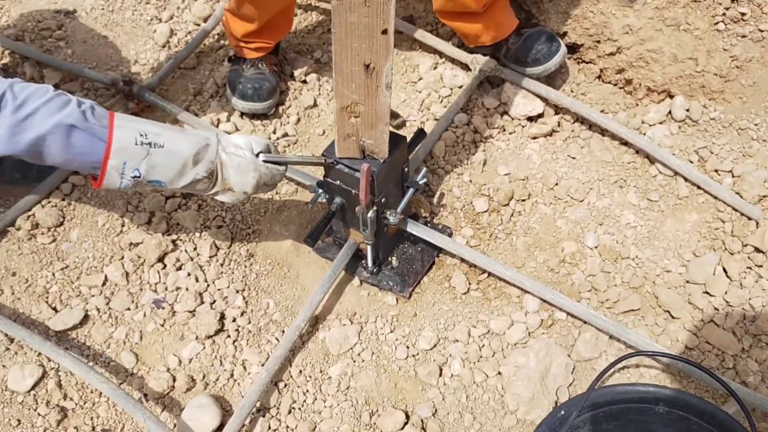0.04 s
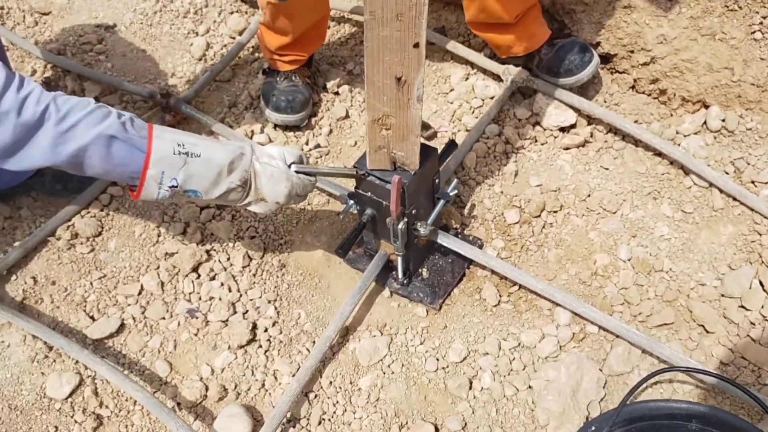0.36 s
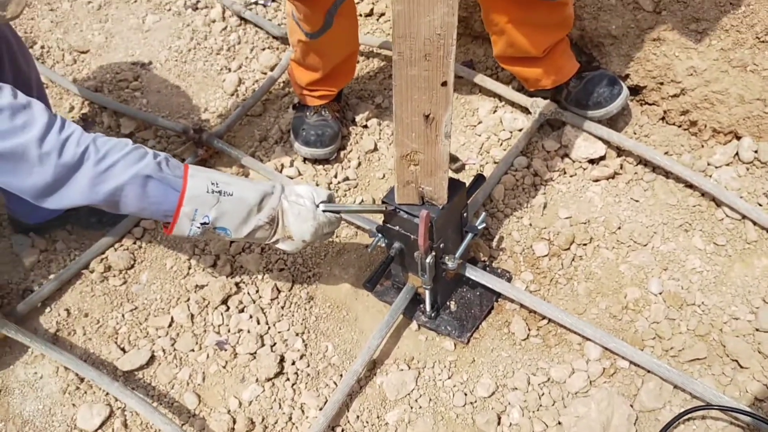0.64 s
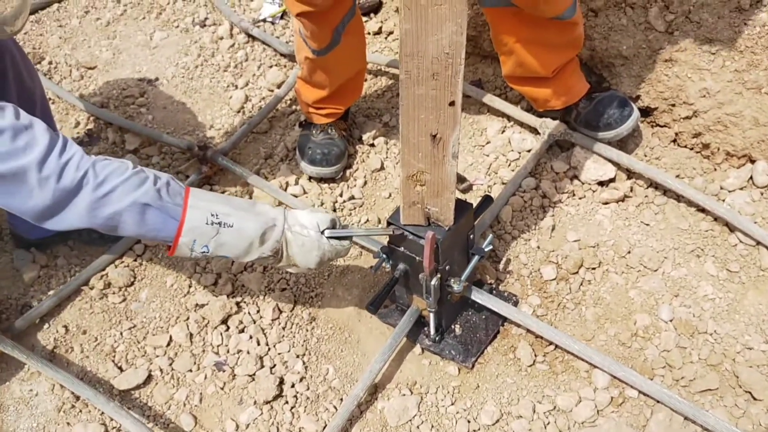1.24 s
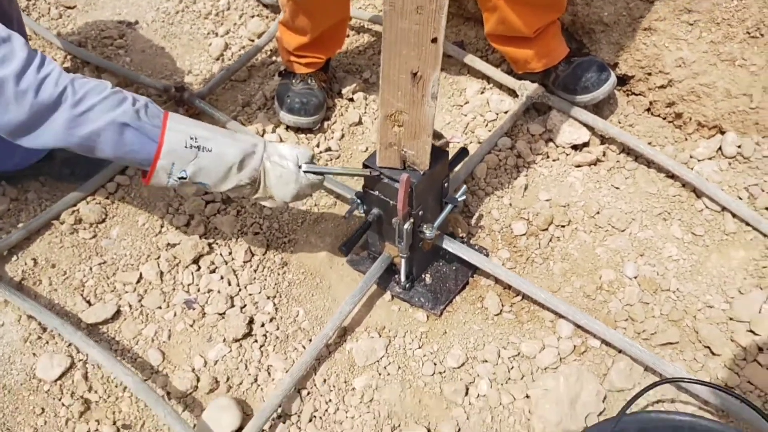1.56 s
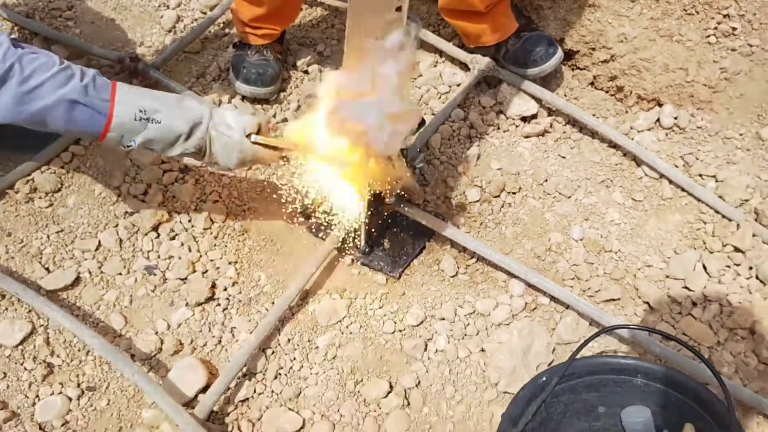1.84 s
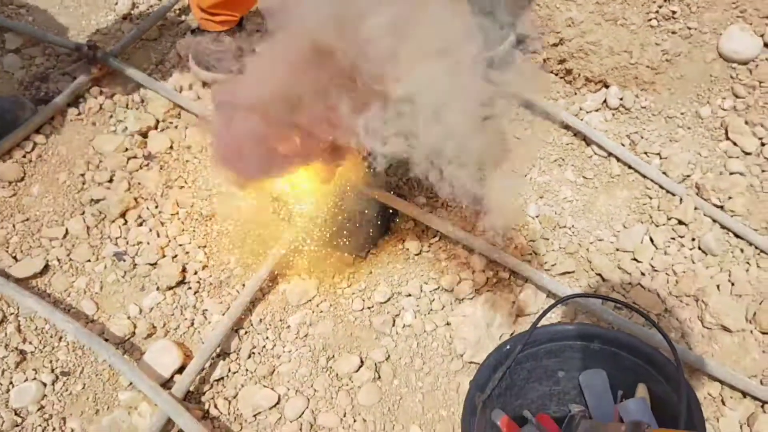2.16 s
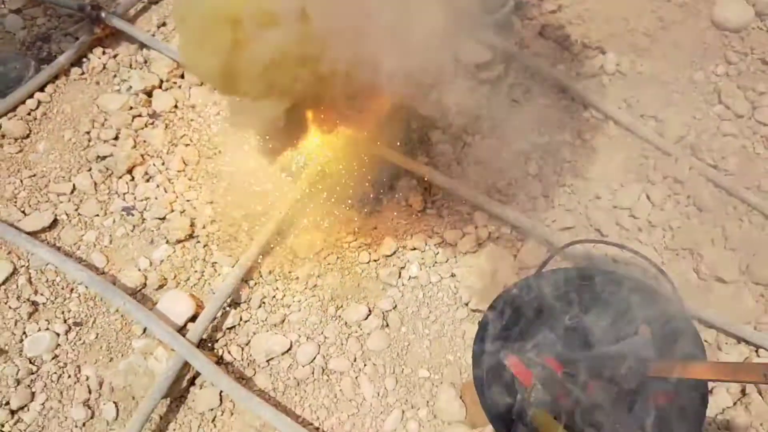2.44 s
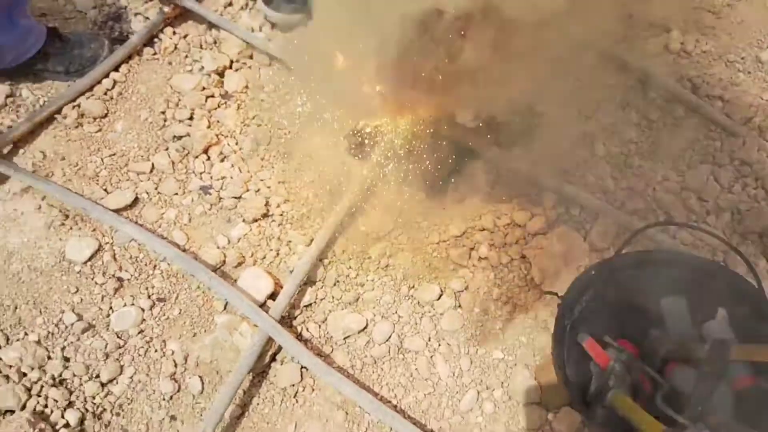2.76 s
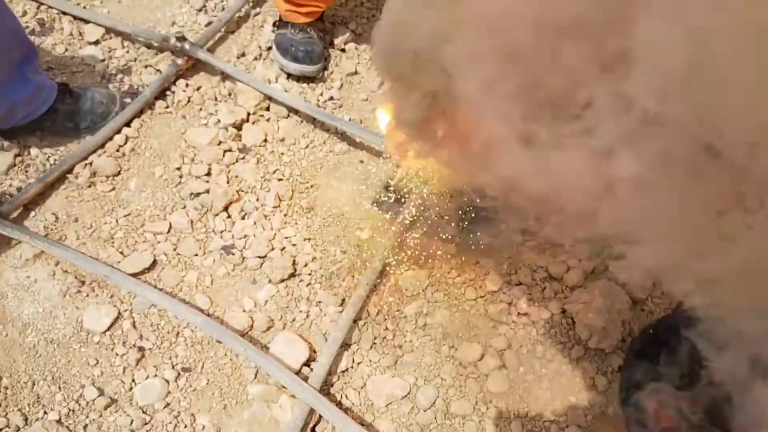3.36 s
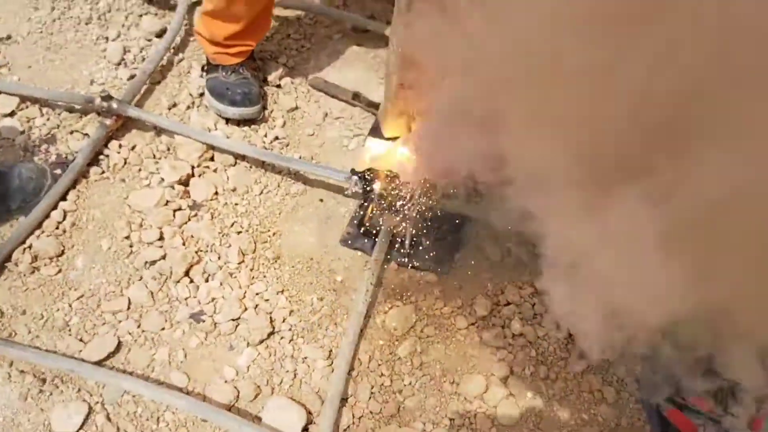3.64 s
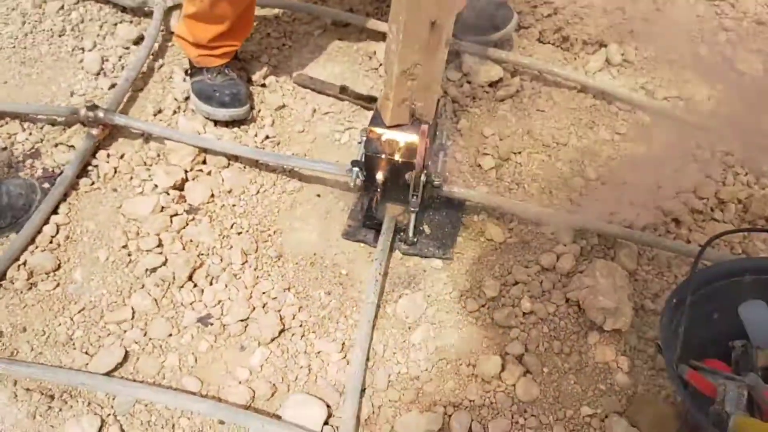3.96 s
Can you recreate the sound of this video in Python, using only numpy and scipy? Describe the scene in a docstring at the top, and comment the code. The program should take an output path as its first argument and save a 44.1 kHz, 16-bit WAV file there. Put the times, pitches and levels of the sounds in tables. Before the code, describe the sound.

A welding charge is lit outdoors, over a steady bright hiss and low engine hum. A flint igniter scrapes among dull handling scuffs, snapping hard at about 0.5 and 1.4 seconds. At 1.6 seconds the powder catches with a small pop and burns with a hollow, fluttering rush. It spits once near 2.6 seconds and dies with a faint fizz around 3.8 seconds.

```python
"""A welding charge burns

A charge is lit in its mould on stony ground, over a steady sizzling hiss and the hum of an engine.
A flint igniter scrapes and snaps; the two hardest snaps make a limiter turn everything down briefly.
The powder catches and burns for two seconds with a hollow, fluttering rush from the mould's mouth."""
import sys
import numpy as np
from scipy import signal
from scipy.fft import rfft, irfft
from scipy.io import wavfile
from scipy.ndimage import uniform_filter1d

SR = 44100
rng = np.random.default_rng(int(sys.argv[2]) if len(sys.argv) > 2 else 0)


def pcm_store(signal):
    """Save signal as 16-bit PCM."""
    levels = np.round(np.clip(np.atleast_2d(signal), -1, 1) * 32767)
    wavfile.write(sys.argv[1], SR, levels.astype(np.int16).T)


N = 176400
T = np.arange(N) / SR
HZ = np.maximum(np.arange(N // 2 + 1) * SR / N, 1)


def amp(db):
    """Turn decibels into a number to multiply a sound by."""
    return 10 ** (np.asarray(db) / 20)


def unit_power(x):
    """Scale a sound so that its average power is 1."""
    return x / np.sqrt(np.mean(x ** 2) + 1e-20)


def level(rows):
    """A volume curve through (time [s], level [dB]) points."""
    return amp(np.interp(T, *np.transpose(rows)))


def drift(rate_hz):
    """A random wander of typical size 1; a higher rate wanders faster."""
    return unit_power(irfft(rfft(rng.standard_normal(N)) / (1 + (HZ / rate_hz) ** 2), N))


def colour(x, points):
    """Shape a sound's lows and highs by (frequency [Hz], level [dB]) points, at power 1."""
    hz, db = np.transpose(points)
    gain = amp(np.interp(np.log(HZ), np.log(hz), db))
    return unit_power(irfft(rfft(x) * gain, N))


def resonant_noise(hz, width_hz):
    """Noise passed twice through one resonance: the narrower it is, the more like a note."""
    r = np.exp(-np.pi * width_hz / SR)
    resonance = [1, 0, -1, 1, -2 * r * np.cos(2 * np.pi * hz / SR), r * r]
    return unit_power(signal.sosfilt([resonance, resonance], rng.standard_normal(N + SR))[SR:])


def swell(peak_s, fade_s, hz, width_hz, db):
    """A band of noise that fades in and out around its peak."""
    return amp(db) * np.exp(-((T - peak_s) / fade_s) ** 2) * resonant_noise(hz, width_hz)


def rasps(rows, tone, attack_s=0.00044, stop_s=0.0014, tail_db=-20.5, tail_s=0.0034):
    """Short bursts of noise: each starts sharply, holds, then stops with a faint tail."""
    envelope = np.zeros(N)
    for start, db, length in rows:
        rise = np.clip((T - start) / attack_s, 0, 1)
        after = np.maximum(T - start - length, 0)
        fall = np.exp(-after / stop_s) + amp(tail_db) * np.exp(-after / tail_s)
        envelope += amp(db) * rise * fall
    grit = colour(rng.standard_normal(N), tone)
    return envelope * grit / np.sqrt(uniform_filter1d(grit ** 2, size=220))   # evens out the noise


# how loud the rumble is: (time [s], level [dB])
RUMBLE_VOLUME = [(0, -35), (.8, -33.5), (1.1, -35.5), (1.5, -36.5), (2.1, -33.5), (3, -35.5), (4, -36)]
# the rumble's tone: (frequency [Hz], level [dB])
RUMBLE_TONE = [(12, 6.5), (25, 1), (42, 3.5), (75, 0), (130, -7.5), (200, -7), (400, -12), (700, -18.5),
               (1000, -25.5), (1500, -32), (3000, -46)]
def rumble():
    """A low outdoor rumble gently rises and falls."""
    return level(RUMBLE_VOLUME) * colour(rng.standard_normal(N), RUMBLE_TONE)


# the notes in the hum: (multiple of the lowest pitch, level [dB])
ENGINE_NOTES = [(1, -32), (2, -39.5), (3, -63.5)]
def engine(pitch_hz=53.9, wobble_rad=0.27, throb_db=-0.5):
    """An engine runs unevenly, so its hum wobbles in pitch and loudness."""
    phase = 2 * np.pi * pitch_hz * T + wobble_rad * drift(6.4)
    hum = np.zeros(N)
    for multiple, db in ENGINE_NOTES:
        strength = np.sqrt(2) * amp(db + throb_db * drift(7.1))
        hum += strength * np.sin(multiple * phase + rng.uniform(0, 2 * np.pi))
    return hum


# how loud the hiss is: (time [s], level [dB])
HISS_VOLUME = [(0, -29.5), (.5, -28.5), (1.4, -28.5), (1.55, -34), (1.68, -31), (1.8, -29.5), (2.15, -28.5),
               (2.5, -30), (3.1, -28.5), (3.55, -29.5), (4, -33)]
# the hiss's tone: (frequency [Hz], level [dB])
HISS_TONE = [(1200, -28), (1700, -25), (2400, -27), (3100, -31), (3400, -22), (3800, -20.5), (4600, -15),
             (5800, -8), (6800, -3), (7450, 2), (7900, -4), (8080, -17.5), (8300, -16), (8600, -52)]
# faint ringing in the hiss: (frequency [Hz], width [Hz], level against the hiss [dB])
HISS_RESONANCES = [(2000, 110, -32.5), (2640, 120, -34.5), (4615, 68, -26), (5380, 150, -23.5)]
def hiss(sizzle_db=1, waver_db=0.58):
    """A fine, bright sizzle with a shrill edge that fades as the powder catches."""
    grains = rng.standard_normal(N) * amp(sizzle_db * drift(590))
    ringing = sum(amp(db) * resonant_noise(hz, width) for hz, width, db in HISS_RESONANCES)
    sizzle = level(HISS_VOLUME) * (colour(grains, HISS_TONE) + ringing)
    edge = level([(1.55, -31.5), (1.67, -59.5)]) * resonant_noise(hz=7476, width_hz=380)
    return (sizzle + edge) * amp(waver_db * drift(23))


# handling noises: (time [s], fade time [s], frequency [Hz], width [Hz], level [dB])
HANDLING = [(0.014, .045, 767, 50, -41), (0.162, 0.2, 430, 250, -46), (0.83, 0.052, 510, 700, -40.5),
            (0.81, 0.017, 2200, 1800, -47.5), (0.926, 0.011, 740, 300, -39), (1.044, 0.0058, 820, 350, -39),
            (1.216, 0.02, 150, 70, -41), (1.331, 0.024, 630, 500, -42.5)]
def scuffs():
    """Handling around the mould makes dull scuffs and knocks."""
    return sum(swell(*row) for row in HANDLING)


# igniter strokes: (time [s], level [dB], length [s], knock against the stroke [dB])
IGNITER_STROKES = [(0.3183, -24, 0.005, -18), (0.5101, -1.5, 0.0036, -19), (0.6973, -18.5, 0.0046, -38),
                   (1.194, -22, 0.0066, -37.5), (1.3598, -23.5, 0.006, -35), (1.4186, -4.5, 0.0031, -17)]
# the flint's tone: (frequency [Hz], level [dB])
FLINT_TONE = [(1200, -33), (2400, -29.5), (3300, -16), (3900, -20.5), (5500, -12.5), (7000, 4.5), (7900, 3),
              (8600, -18.5)]
# the tone of the frame's knock: (frequency [Hz], level [dB])
FRAME_TONE = [(100, -3), (550, 6.5), (1000, -8.5), (1700, -5), (3300, -13), (6000, -29)]
def igniter():
    """The flint scrapes brightly; a hard stroke also knocks the igniter's frame."""
    scrapes = [(start, db, length) for start, db, length, _ in IGNITER_STROKES]
    knocks = [(start, db + knock, length) for start, db, length, knock in IGNITER_STROKES]
    return rasps(scrapes, FLINT_TONE) + rasps(knocks, FRAME_TONE)


# the first pop and a later spark: (time [s], level [dB], length [s])
SPARK_BURSTS = [(1.6068, -21, 0.0041), (2.642, -24.5, 0.0054)]
# a spark's tone: (frequency [Hz], level [dB])
SPARK_TONE = [(1500, -35), (3000, -20.5), (4000, -6.5), (5500, 0.5), (6700, 2.5), (7800, 8), (8500, -31)]
def sparks():
    """The powder pops as it catches, spits once and fizzes as it dies."""
    pops = rasps(SPARK_BURSTS, SPARK_TONE)
    fizz = swell(peak_s=3.75, fade_s=0.029, hz=4120, width_hz=510, db=-43)
    return pops + fizz


# how strong the burn is: (time [s], level [dB], flame against it [dB], deep note against it [dB])
BURN_VOLUMES = [(1.55, -54, -8, -0.5), (1.67, -42.5, -6.5, -4), (1.87, -38, -9, -2),
                (2.05, -38.5, -20, -1.5), (2.3, -40.5, -21, -2), (2.62, -35.5, -13.5, -4.5),
                (2.8, -36.5, -16.5, -5), (3.05, -38.5, -9.5, -1), (3.3, -36, -17, -4.5),
                (3.419, -37.5, -21, -3), (3.58, -35, -24.5, -7.5), (3.78, -40.5, -25, -9),
                (3.87, -56.5, -7, -4), (4, -56, -12, -8)]
def burn(flutter_db=1, flutter_hz=32):
    """Fluttering gas sounds two hollow notes in the mould's mouth; open flame adds a brighter one."""
    strength, flame_gain, deep_gain = (level(np.array(BURN_VOLUMES)[:, [0, k]]) for k in (1, 2, 3))
    mouth = resonant_noise(hz=840, width_hz=191)
    deep = deep_gain * resonant_noise(hz=597, width_hz=238)
    flame = flame_gain * resonant_noise(hz=1094, width_hz=157)
    return strength * (mouth + deep + flame) * amp(flutter_db * drift(flutter_hz))


def scene():
    """All the sounds add up in one channel."""
    return (rumble() + engine() + hiss() + scuffs() + igniter() + sparks() + burn())[None]


def hold(excess_db, look_ahead_s=0.0056, block=1024, offset=256, hold_blocks=3):
    """Start a volume cut just before a loud sound and keep it for a few blocks of samples."""
    ahead = int(look_ahead_s * SR)
    held = np.zeros(N)
    for start in range(offset - block, N, block):
        first, end = max(start, 0), min(start + block, N)
        oldest = max(start - hold_blocks * block, 0)
        highest = np.maximum.accumulate(excess_db[oldest:end + ahead])
        held[first:end] = highest[first - end:]
    return held


def release(cut_db, db_per_s):
    """Let a volume cut shrink at a steady rate."""
    return np.maximum.accumulate(cut_db + db_per_s * T) - db_per_s * T


def record(dry, limit_db=-15, slow_share=0.25, cutoff_hz=9180):
    """A limiter dips the volume on loud snaps and recovers fast, then slowly; the top treble is cut."""
    power = uniform_filter1d(dry[0] ** 2, size=176)
    level_db = 10 * np.log10(np.abs(power) + 1e-12)
    held = hold(np.maximum(level_db - limit_db, 0))
    slow, fast = release(held, db_per_s=106), release(held, db_per_s=4008)
    cut_db = slow_share * slow + (1 - slow_share) * fast
    limited = dry * amp(-uniform_filter1d(cut_db, size=66))
    return signal.sosfilt(signal.cheby2(20, 70, cutoff_hz, fs=SR, output="sos"), limited)


dry = scene()
out = record(dry)
pcm_store(out)
```